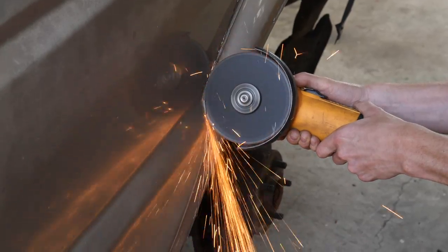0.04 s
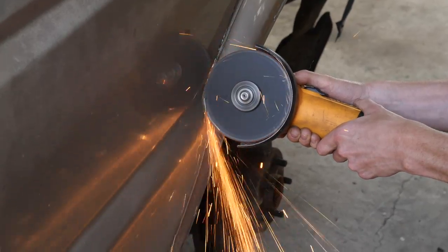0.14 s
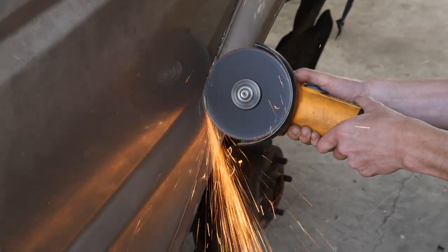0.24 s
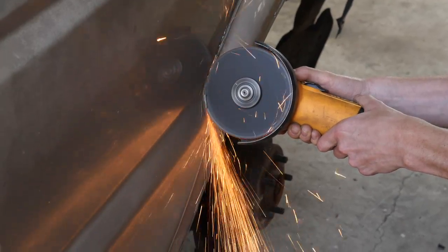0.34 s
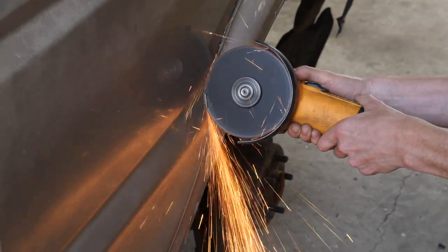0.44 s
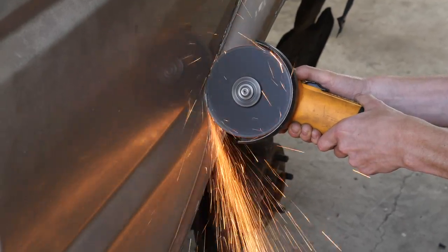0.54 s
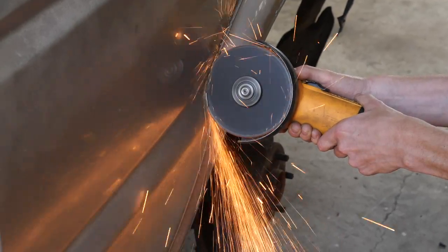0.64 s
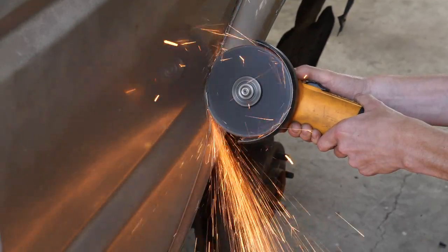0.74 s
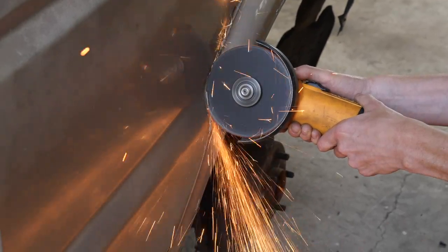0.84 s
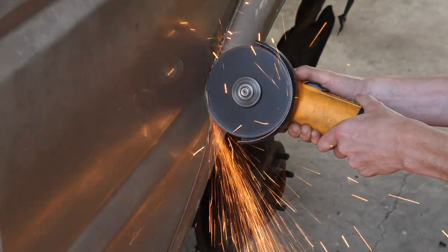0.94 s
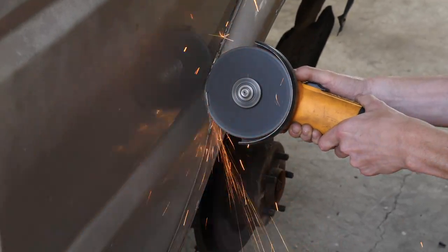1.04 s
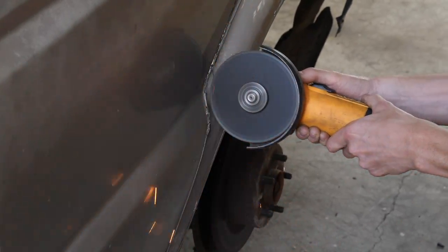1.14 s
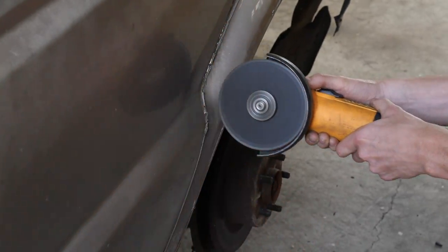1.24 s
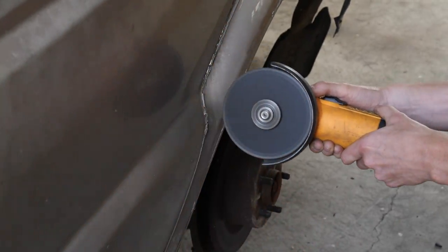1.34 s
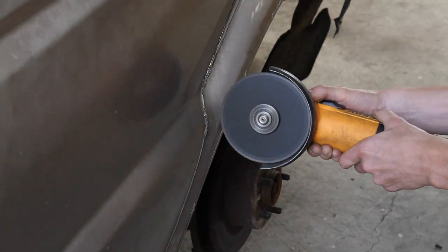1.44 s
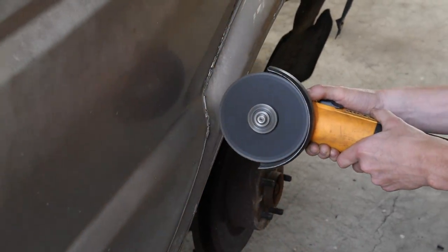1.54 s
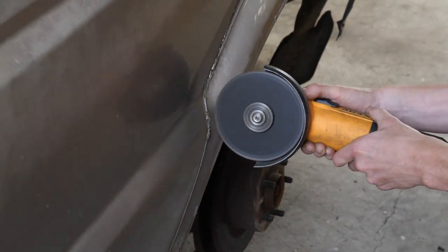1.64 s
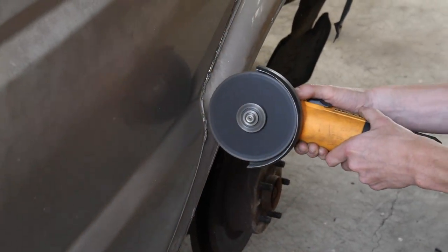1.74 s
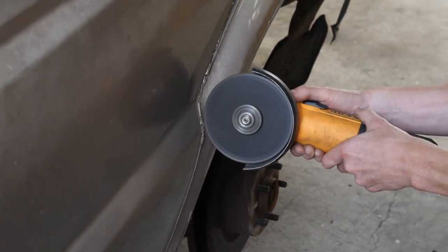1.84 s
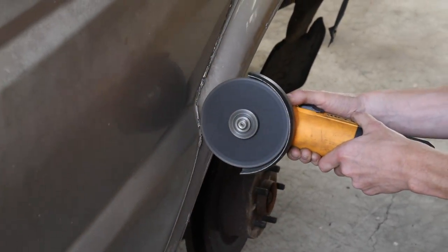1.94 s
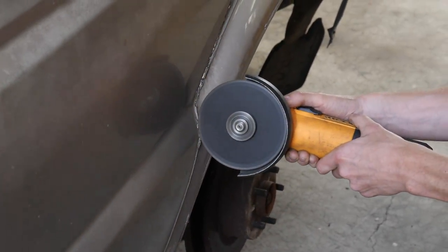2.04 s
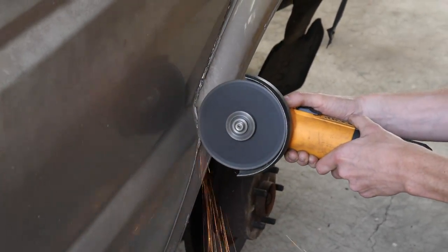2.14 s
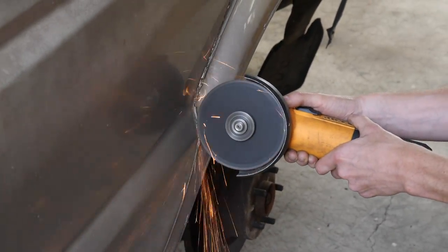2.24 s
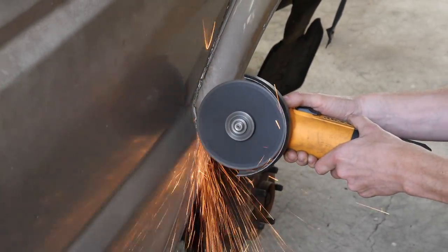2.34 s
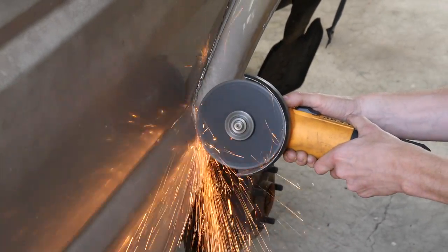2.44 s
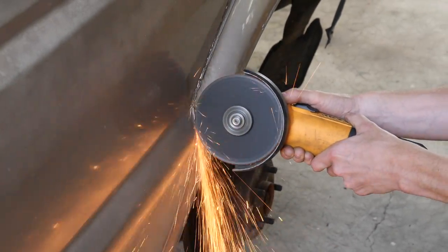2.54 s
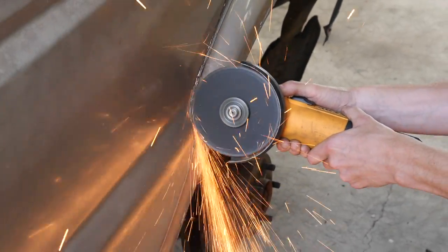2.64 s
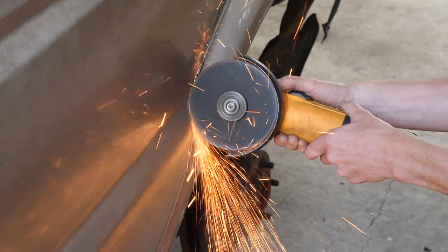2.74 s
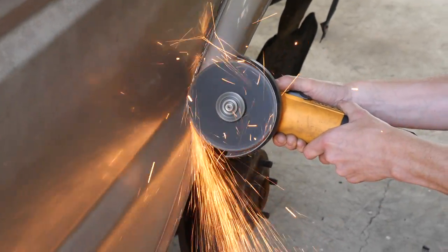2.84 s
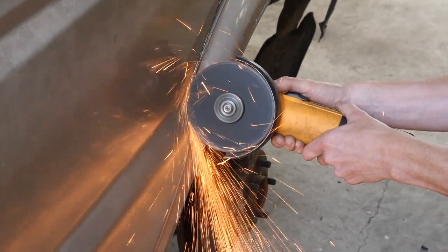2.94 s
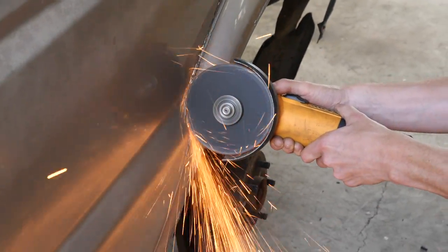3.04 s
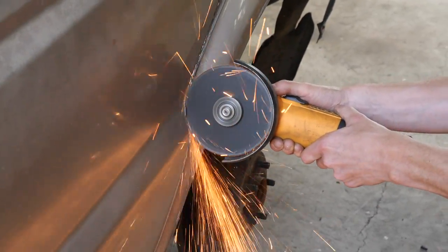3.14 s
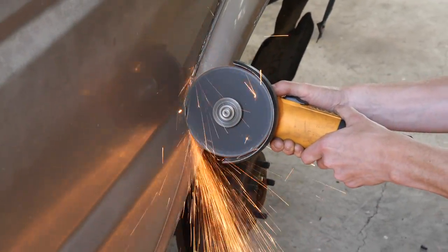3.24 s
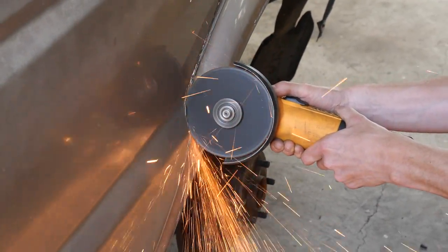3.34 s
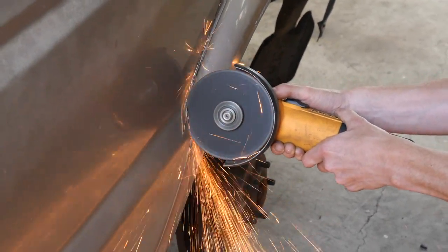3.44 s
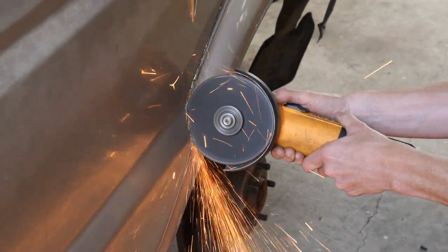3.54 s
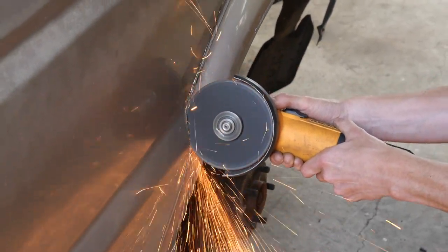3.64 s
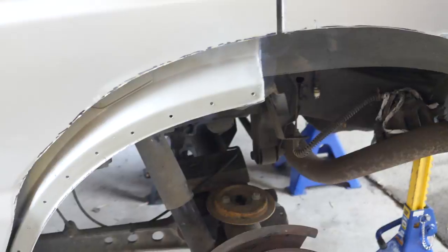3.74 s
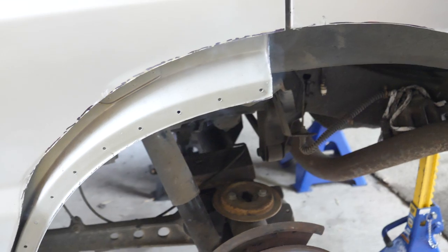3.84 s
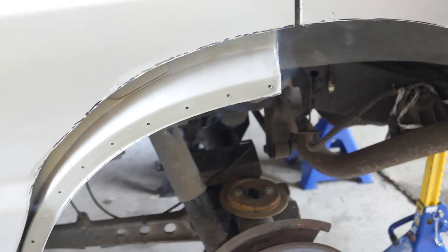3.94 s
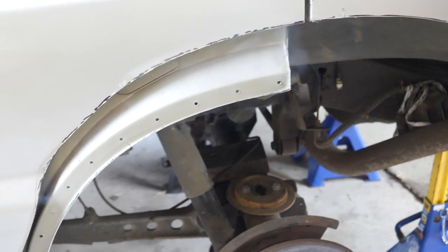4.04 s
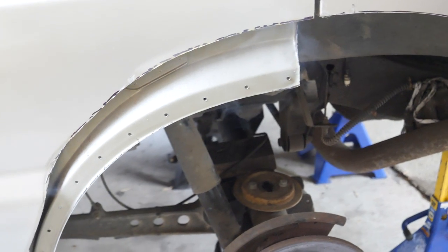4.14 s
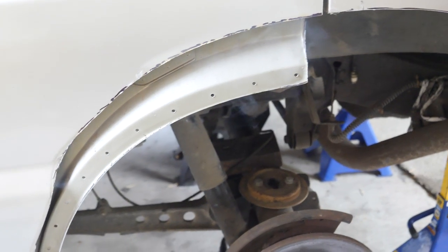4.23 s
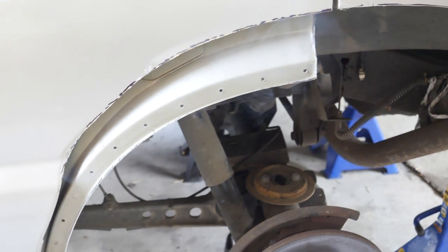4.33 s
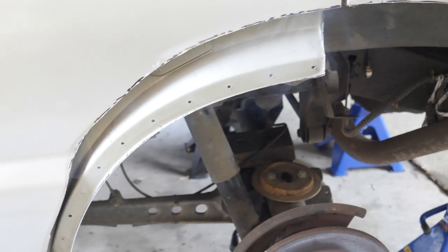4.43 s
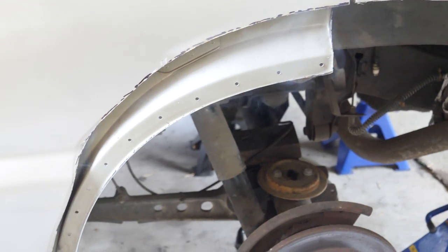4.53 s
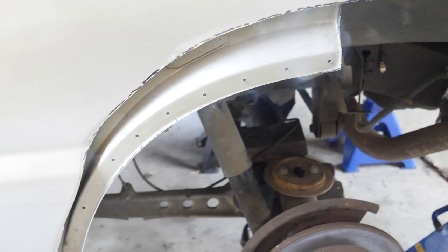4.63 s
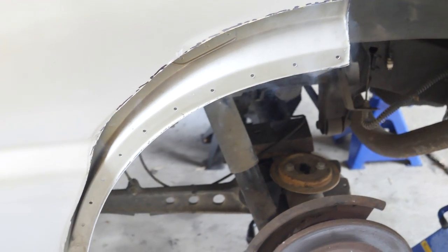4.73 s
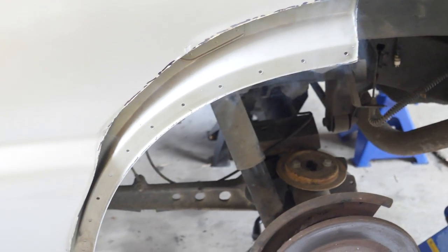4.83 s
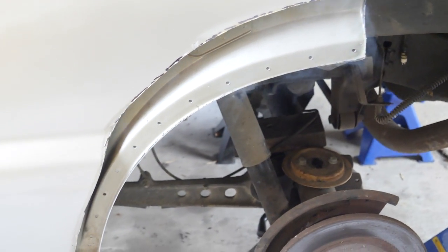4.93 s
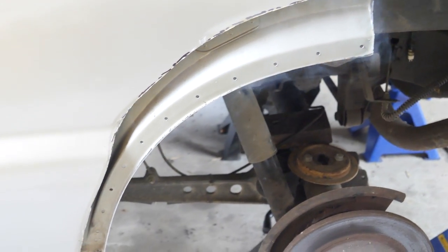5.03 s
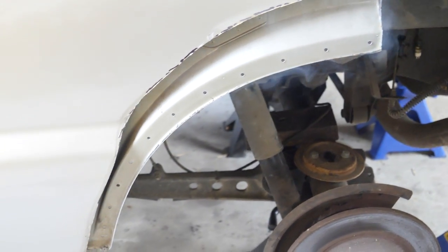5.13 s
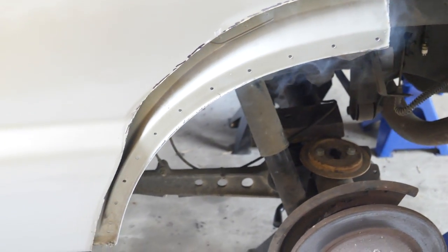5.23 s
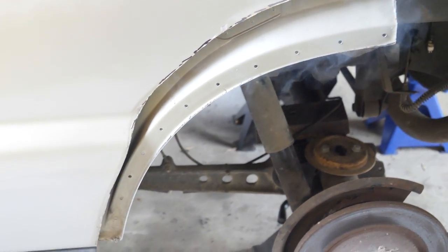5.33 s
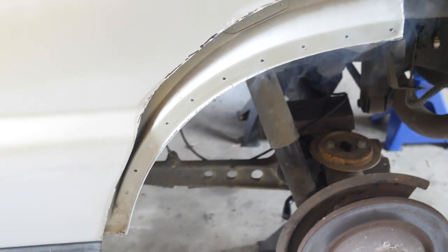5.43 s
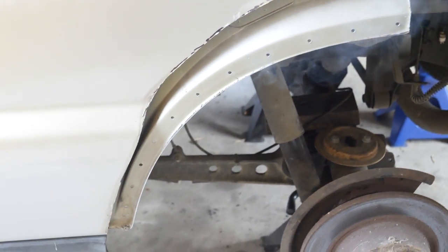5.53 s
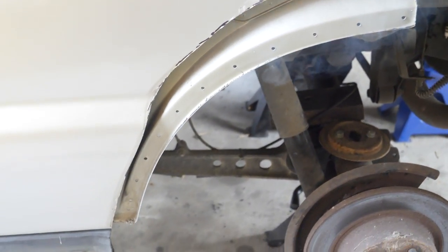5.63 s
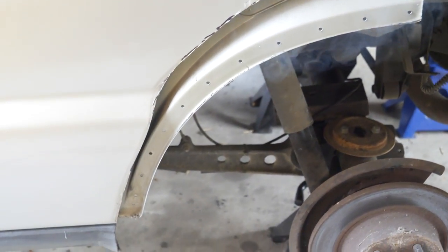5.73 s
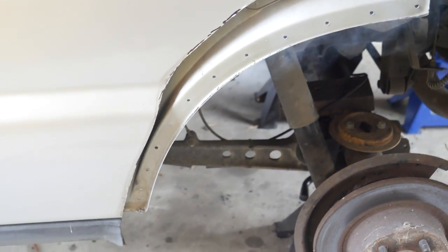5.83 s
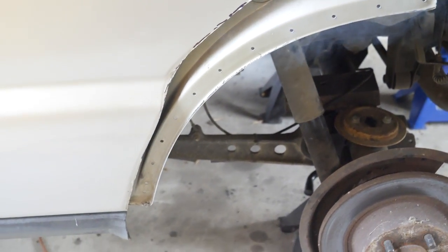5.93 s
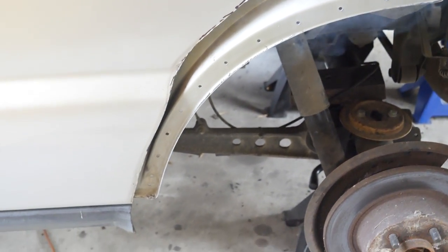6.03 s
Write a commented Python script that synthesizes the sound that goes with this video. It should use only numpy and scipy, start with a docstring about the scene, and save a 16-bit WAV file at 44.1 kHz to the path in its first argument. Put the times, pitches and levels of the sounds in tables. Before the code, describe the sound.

An angle grinder screeches through a steel panel, lifts off and winds up freely, bites again with sagging pitch, then cuts off abruptly into near silence.

```python
"""In a yard, an angle grinder cuts a steel body panel close to an overloaded microphone.
The disc slows under load, is lifted off, speeds up and bites again; the sound of the tool is cut off
abruptly, leaving a quiet yard. The cut is a sum of multiples of the disc speed, coloured by the panel,
with noise for loose grit. The motor is whining tones, rushing air and a gear rattle that throbs.
The yard is the noise of far traffic, a low flutter and two small rustles."""
import sys
import numpy as np
from scipy import signal
from scipy.io import wavfile
from scipy.ndimage import uniform_filter1d

SR = 44100
rng = np.random.default_rng(int(sys.argv[2]) if len(sys.argv) > 2 else 0)


def pcm_store(signal):
    """Save signal as 16-bit PCM."""
    levels = np.round(np.clip(np.atleast_2d(signal), -1, 1) * 32767)
    wavfile.write(sys.argv[1], SR, levels.astype(np.int16).T)


N = 268123  # length of the scene in samples
LIFT_S, TOUCH_S = 1.155, 2.118  # the disc leaves the metal, and returns
STOP_S = 3.7645  # the sound of the tool is cut off


def gain_of(db):
    """Turn decibels into a factor."""
    return 10 ** (np.asarray(db) / 20)


def evened(x):
    """Scale to an average power of one."""
    return x / np.sqrt(np.mean(x ** 2) + 1e-20)


def curve(rows, t):
    """Read the columns of a table at the times t, with straight lines between rows."""
    s, *columns = np.transpose(rows)
    return [np.interp(t, s, c) for c in columns]


def span(t, start, end, edge):
    """One between start and end, zero outside, with sloped edges."""
    return np.clip(np.minimum(t - start, end - t) / edge + .5, 0, 1)


def wander(t, seconds, count):
    """Slow random drift of unit size, one row for each partial; a stretched t makes it faster."""
    knots = np.arange(-1, t[-1] + 1, .02)
    x = rng.standard_normal((count, len(knots)))
    for _ in range(2):
        x = uniform_filter1d(x, max(round(seconds / .02), 1), axis=1)
    return [np.interp(t, knots, row) for row in evened(x)]


def noise(points, length, patchy_db):
    """Noise of unit power from random short-time spectra with the given colour and drifting patches."""
    hz = np.fft.rfftfreq(1024, 1 / SR)
    a, b, patches = rng.standard_normal((length // 256 + 5, 513, 3)).T
    patches = uniform_filter1d(patches, size=8, axis=0)  # smooth over pitch
    patches = evened(uniform_filter1d(patches, size=16, axis=1))  # smooth over time
    f, db = np.transpose(points)
    colour_db = np.interp(np.log(hz + 1), np.log(f + 1), db)[:, None]
    spectra = (a + 1j * b) * gain_of(colour_db + patchy_db * patches)
    sound = signal.istft(spectra, nperseg=1024, noverlap=768)[1]
    return evened(sound[:length])


# how fast the disc turns under load: (time [s], speed [turns per s])
LOADED_SPEED = [(0, 132.8), (.102, 130.4), (.208, 129.1), (.432, 130), (.682, 127.3), (.95, 125.5),
                (1.044, 126.7), (1.114, 129.5), (2.278, 168.1), (2.348, 167.9), (2.508, 165.8),
                (2.732, 158.8), (2.768, 156.9), (2.892, 152.8), (3.2, 148.2), (3.53, 143.9), (3.714, 142.3)]
RUN_UP_S, LOADED_S = 1.114, 2.278  # the run-up starts, the loaded speeds take over again
FREE_SPEED, RUN_UP_TAU_S = 171, .435  # turns per s, and how slowly the disc creeps up to it


def disc_speed(t):
    """Turns per second: the load sets them in the cut, the motor winds up out of it."""
    loaded, = curve(LOADED_SPEED, t)
    start_speed = curve(LOADED_SPEED, RUN_UP_S)[0]
    still_to_gain = (FREE_SPEED - start_speed) * np.exp((RUN_UP_S - t) / RUN_UP_TAU_S)
    return np.where((t > RUN_UP_S) & (t < LOADED_S), FREE_SPEED - still_to_gain, loaded)


# resonances of the panel; a multiple of the disc speed sings while it passes one:
# (pitch [Hz], width [Hz], level in the first cut [dB], level in the second cut [dB])
PANEL_RESONANCES = [(147, 30, -39, -35), (386.9, 30, -27, -36.5), (490, 45, -39.5, -23),
                    (759, 37, -16.5, -31.5), (1178, 30, -23.5, -16.5), (1295, 40, -19, -25),
                    (1700, 70, -12, -13.5), (1810, 50, -19, -13), (1934, 60, -19.5, -14),
                    (2280, 32, -17.5, -25.5), (3904, 90, -15.5, -24), (4624, 120, -21.5, -16),
                    (4960, 120, -17.5, -15), (5193, 58, -17, -17), (5480, 60, -21, -14),
                    (8000, 120, -34.5, -25.5)]


def panel(hz, second_cut):
    """Gain of the panel's resonances at the pitches hz; their powers add up."""
    power = 0
    for f, width, early_db, late_db in PANEL_RESONANCES:
        peak_power = gain_of(2 * np.where(second_cut, late_db, early_db))
        power = power + peak_power / (1 + (2 * (hz - f) / width) ** 4)
    return np.sqrt(power)


# colour of the uneven rim through the panel: (pitch [Hz], level before RIM_DB is added [dB])
RIM_COLOUR = [(130, -22.5), (330, -20), (520, -14), (800, -7), (1700, -3), (2800, -9), (4000, -4.5),
              (5000, -4.5), (6200, -10), (9000, -10.5), (15000, -18)]
RIM_DB = -17
# the loudest squeals, each one multiple held for a while:
# (start [s], end [s], multiple of the disc speed, peak before the bite level [dB])
SQUEALS = [(0.0, 0.107, 7, -12.5), (0.03, 0.321, 13, -6), (0.03, 0.4, 34, -12), (0.06, 0.75, 32, -6.5),
           (0.2, 0.6, 28, -11.5), (0.23, 0.73, 30, -12), (0.329, 0.593, 13, -13.5), (0.34, 0.57, 10, -13),
           (0.37, 0.59, 40, -14), (0.59, 0.76, 14, -11), (0.6, 1.006, 18, -12), (0.66, 1.047, 13, -6),
           (0.66, 1.07, 15, -11.5), (0.73, 0.96, 41, -13.5), (0.85, 1.009, 38, -10.5),
           (2.12, 2.35, 10, -15), (2.22, 2.5, 7, -9), (2.25, 2.6, 47, -17), (2.28, 2.421, 29, -13.5),
           (2.35, 2.71, 11, -7.5), (2.37, 2.658, 10, -10), (2.5, 2.716, 31, -7), (2.53, 2.63, 28, -8.5),
           (2.58, 2.804, 30, -11.5), (2.614, 2.703, 7, -12), (2.66, 2.85, 32, -5), (2.74, 3.059, 33, -11.5),
           (2.71, 2.86, 9, -9), (2.74, 2.872, 8, -8.5), (2.74, 2.918, 31, -8.5), (2.76, 2.88, 2, -20),
           (2.77, 2.88, 6, -14.5), (2.79, 3.058, 15, -12.5), (2.81, 3.28, 11, -12), (2.86, 3.13, 13, -10),
           (2.9, 3.35, 34, -9.5), (3.143, 3.49, 13, -11), (3.04, 3.359, 31, -10.5), (3.22, 3.65, 8, -12),
           (3.276, 3.8, 32, -9.5), (3.36, 3.66, 36, -11), (3.375, 3.8, 12, -8.5), (3.43, 3.545, 34, -6),
           (3.579, 3.799, 38, -8.5)]
# contact with the metal: (time [s], bite of the disc [dB], loose grit relative to the bite [dB])
BITE_AND_GRIT = [(0, -5.5, -12), (.9, -5.5, -8.5), (1.04, -6, -3.5), (1.13, -10, -10.5), (2.12, -8, -8.5),
                 (2.4, -6, -8.5), (2.75, -6, -6.5), (2.95, -4, -10), (3.6, -7.5, -4.5), (3.77, -6.5, -8.5)]
# colour of grit scraping on steel: (pitch [Hz], relative level [dB per Hz])
GRIT_COLOUR = [(60, -65.5), (200, -35), (450, -11.5), (800, -10.5), (1450, -5), (1700, 2), (2100, -9),
               (2900, -11), (3700, -9), (4900, -2), (5600, -3.5), (6500, -10), (15500, -7.5)]
# brief tones as the disc snags on its way out: (time [s], length [s], level [dB], pitch [Hz])
SNAG_TONES = [(1.037, .08, -26, 200), (1.148, 0.0086, -5.5, 1693)]


def cutting(t, turns):
    """The rim rubs the panel in a pattern that repeats each turn; loose grit scrapes in between."""
    count = 105  # multiples of the disc speed
    coarse = t[::64]  # levels move slowly, so fewer points are enough
    speed = disc_speed(coarse)
    hz, db = np.transpose(RIM_COLOUR)
    level = []
    for k, drift in enumerate(wander(coarse, seconds=.14, count=count)):
        pitch = (k + 1) * speed
        rim_db = np.interp(np.log(pitch), np.log(hz), db) + RIM_DB
        rim = gain_of(rim_db + 4.2 * drift)
        ringing = panel(pitch, coarse > LIFT_S) * gain_of(3.6 * drift)
        level.append(np.hypot(rim, ringing))

    unsteady = wander(coarse * 2, seconds=.08, count=count)  # the singing is never quite steady
    for start, end, multiple, peak_db in SQUEALS:
        k = round(multiple) - 1
        held = span(coarse, start, end, edge=0.0605)
        squeal = gain_of(peak_db + 1.4 * unsteady[k])
        level[k] = (1 - held) * level[k] + held * squeal

    turns = turns + 0.0034 * wander(t, seconds=.04, count=1)[0]  # the hand makes them a little uneven
    phase = rng.random(count)
    rub = 0
    for k in range(count):
        tone = np.cos(2 * np.pi * ((k + 1) * turns + phase[k]))
        rub = rub + np.interp(t, coarse, level[k]) * tone

    bite_db, grit_db = curve(BITE_AND_GRIT, t)
    once_per_turn = 1 + .2 * np.cos(2 * np.pi * turns)
    grit = noise(GRIT_COLOUR, len(t), patchy_db=5.0) * once_per_turn
    snags = 0
    for s, length, db, hz in SNAG_TONES:
        swell = np.exp(-((t - s) / (length / 2)) ** 2)
        snags = snags + gain_of(db) * swell * np.sin(2 * np.pi * hz * t)
    contact = 1 - span(t, LIFT_S, TOUCH_S, edge=0.006)
    return contact * gain_of(bite_db) * (rub + gain_of(grit_db) * grit) + snags


# tones of the armature (the motor's turning core), fan, gear teeth and a bearing:
# (start [s], end [s], multiple of the armature speed, peak [dB])
WHINE_TONES = [(1, 3.8, 1, -38.5), (0, .58, 1, -25), (0.94, 2.7, 2, -34.5), (0.5, 1.6, 4.325, -24.5),
               (1.5, 2.12, 4.325, -27), (3, 3.4, 8, -24.5), (1.075, 1.13, 9, -14), (1.19, 1.4, 9, -21),
               (-1, 0.54, 10, -20)]
# colour of fan and brushes: (pitch [Hz], relative level [dB per Hz])
AIR_COLOUR = [(60, -49), (300, -30.5), (520, -26), (760, -15), (880, -4), (1000, -14.5), (1500, -10.5),
              (2300, -8.5), (2900, -12), (3600, -4), (4200, -11.5), (5400, -10), (6700, -20),
              (10000, -23.5), (15500, -30.5)]
GEAR = 32 / 9  # armature turns per disc turn
MOTOR_FREE_DB, MOTOR_LOADED_DB = -17.5, -18.5
MAINS_BEAT_HZ, BEAT_START = 100.0, .1  # two pulses per mains cycle; start in parts of a pulse
THROB_PER_SPEED, THROB_LOADED = 0.032, 0.19  # depth: per turn per s still to gain when free; under load
HOUSING_HZ = 4918  # the gear rattle follows the tooth rate up to here
RATTLE_WIDTH_HZ, RATTLE_DB = 422, -2.5  # half width of the gear housing's resonance; level before strain
RATTLE_STRAIN_DB = 1.86  # dB per unit of depth: the deeper the throb, the louder the rattle


def motor(t, turns):
    """Armature tones over rushing air; the torque pulses twice per mains cycle and rattles the gears."""
    speed = disc_speed(t)
    free = span(t, LIFT_S, TOUCH_S, edge=.06)
    level_db = MOTOR_LOADED_DB + (MOTOR_FREE_DB - MOTOR_LOADED_DB) * free
    free_depth = THROB_PER_SPEED * (FREE_SPEED - speed)
    depth = THROB_LOADED + (free_depth - THROB_LOADED) * free

    jitter = 0.098 * wander(t * 3, seconds=.04, count=1)[0]
    beat = np.cos(2 * np.pi * (MAINS_BEAT_HZ * t + BEAT_START + jitter))
    knock_size = gain_of(2.44 * wander(t * 4, seconds=.04, count=1)[0])
    pulse = (.5 + .5 * beat) ** 1.9 * knock_size  # short knocks of unequal size
    throb = 1 + 6.4 * depth * pulse
    throb = throb / np.sqrt(uniform_filter1d(throb ** 2, size=4410))  # same power over each 0.1 s

    rattle_hz = np.minimum(9 * GEAR * speed, HOUSING_HZ)
    housing = signal.butter(3, RATTLE_WIDTH_HZ, fs=SR)
    a, b = signal.lfilter(*housing, rng.standard_normal((2, len(t))))
    carrier = np.exp(2j * np.pi * np.cumsum(rattle_hz) / SR)  # moves the low noise up to the rattle pitch
    rattle = evened(((a + 1j * b) * carrier).real) * throb
    rattle_gain = gain_of(RATTLE_DB + RATTLE_STRAIN_DB * depth)
    air = noise(AIR_COLOUR, len(t), patchy_db=1.0) * throb ** 0.14

    drifts = wander(t, seconds=.1, count=len(WHINE_TONES))
    armature = GEAR * (turns + .003 * wander(t, seconds=.04, count=1)[0])
    tones = 0
    for (start, end, multiple, db), drift in zip(WHINE_TONES, drifts):
        level = gain_of(db + 1.5 * drift) * span(t, start, end, edge=.08)
        tones = tones + level * np.cos(2 * np.pi * multiple * armature)
    return gain_of(level_db) * (air + rattle_gain * rattle) + tones


# colour of far traffic: (pitch [Hz], relative level [dB per Hz])
TRAFFIC_COLOUR = [(20, 3), (40, 0.5), (90, -3), (180, -4.5), (247, -9), (280, 1.5), (350, -13), (430, -3),
                  (590, -9), (820, -3.5), (1000, -7), (1250, -14), (1900, -17.5), (15500, -38)]
# small rustles: (time [s], length [s], level [dB], pitch [Hz], width [Hz], broad hiss [dB])
RUSTLE_EVENTS = [(4.143, 0.056, -68, 3200, 1790, -74), (5.15, 0.06, -73.5, 3700, 600, -72)]
YARD_DB = -64.5
FLUTTER_S, FLUTTER_DB, FLUTTER_HZ = 4.8, -54, 13.5  # start, level, average rate


def yard():
    """Far traffic wash as noise, a low flutter as a wavering sine, and two small rustles of noise."""
    t = np.arange(N) / SR
    out = gain_of(YARD_DB) * noise(TRAFFIC_COLOUR, N, patchy_db=0.0)
    flutter_hz = FLUTTER_HZ * (1 + .08 * wander(t, seconds=.1, count=1)[0])
    fade_in = np.clip((t - FLUTTER_S) / .1, 0, 1)
    out = out + gain_of(FLUTTER_DB) * fade_in * np.sin(2 * np.pi * np.cumsum(flutter_hz) / SR)
    hiss = noise([(1000, -30), (2000, 0), (5500, -3), (9000, -20)], N, patchy_db=0.0)
    for s, length, db, hz, width, hiss_db in RUSTLE_EVENTS:
        band = [(hz - width, -30), (hz - width / 2, -3), (hz, 0), (hz + width / 2, -5), (hz + 2 * width, -25)]
        rustle = gain_of(db) * noise(band, N, patchy_db=4.0) + gain_of(hiss_db) * hiss
        out = out + rustle * np.exp(-((t - s) / (length / 2)) ** 2)
    return out


def scene():
    """The tool until its sound is cut off, over the yard; one microphone feeds both channels."""
    t = np.arange(round(STOP_S * SR)) / SR
    turns = np.cumsum(disc_speed(t)) / SR
    mix = yard()
    mix[:len(t)] += cutting(t, turns) + motor(t, turns)
    return np.array([mix, mix])


CEILING, BASS_HZ, EDGE_HZ = 0.44, 109.9, 15760  # peak limit, thinned below, upper band limit


def record(dry):
    """The input stage overloads and flattens the peaks, the bass is thinned; then the band limit."""
    knee = 16  # higher bends more sharply at the ceiling
    flat = dry / (1 + abs(dry / CEILING) ** knee) ** (1 / knee)
    bass = signal.lfilter(*signal.butter(1, BASS_HZ, fs=SR), flat)
    thin = flat - 0.709 * bass
    band_limit = signal.firwin(1023, EDGE_HZ, window=("kaiser", 10), fs=SR)
    return signal.oaconvolve(thin, band_limit[None], "same")


dry = scene()
out = record(dry)
pcm_store(out)
```